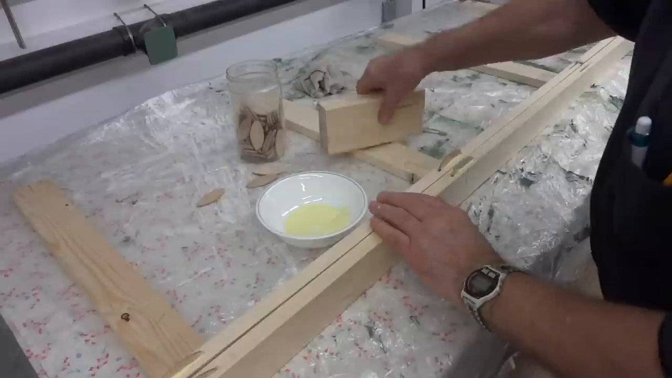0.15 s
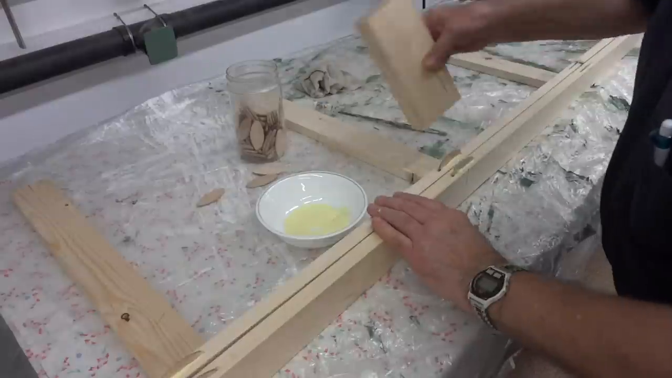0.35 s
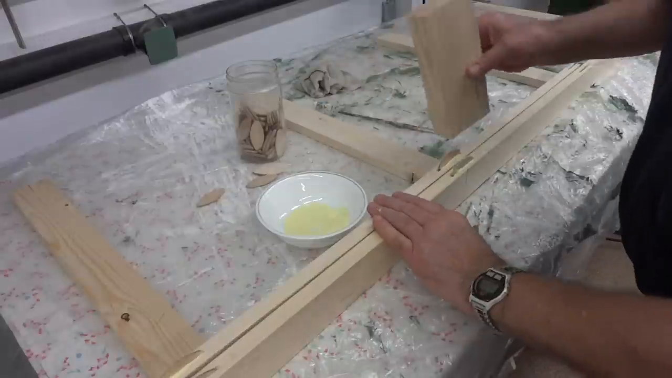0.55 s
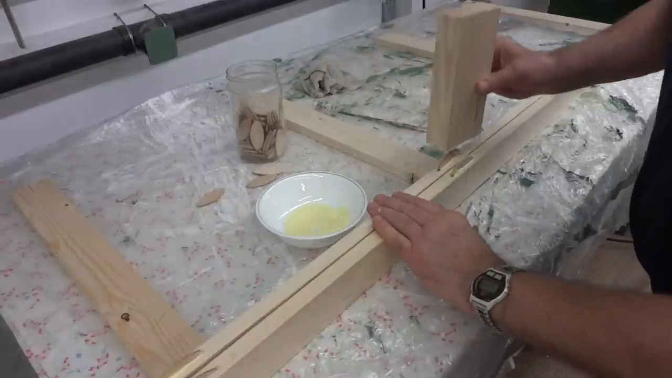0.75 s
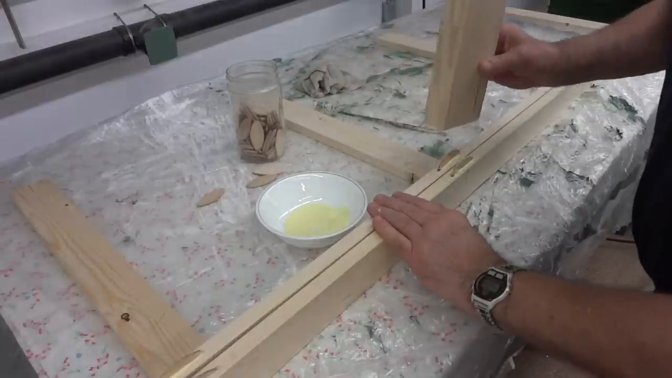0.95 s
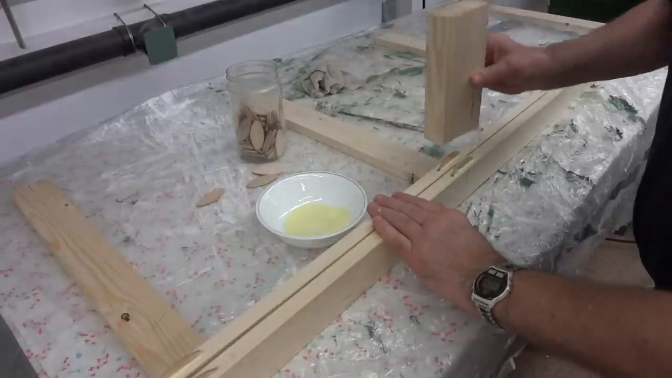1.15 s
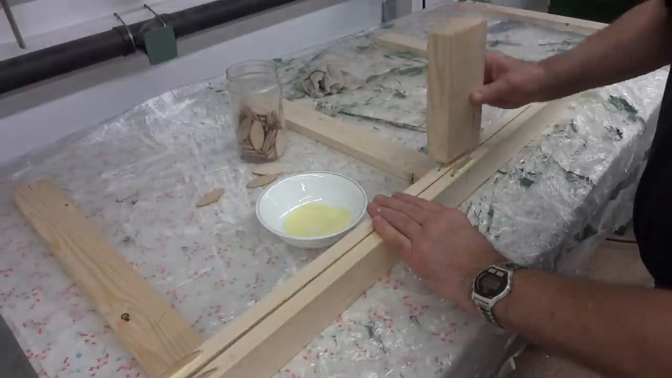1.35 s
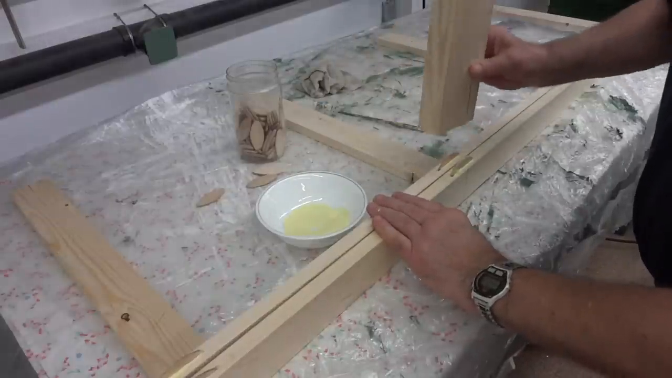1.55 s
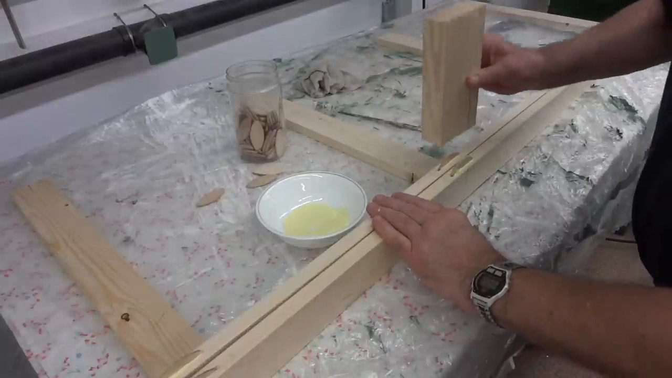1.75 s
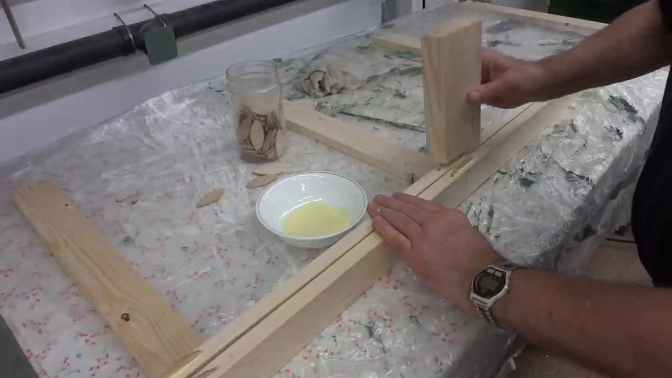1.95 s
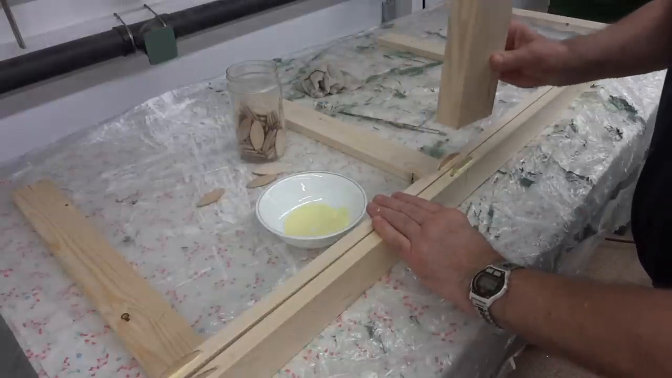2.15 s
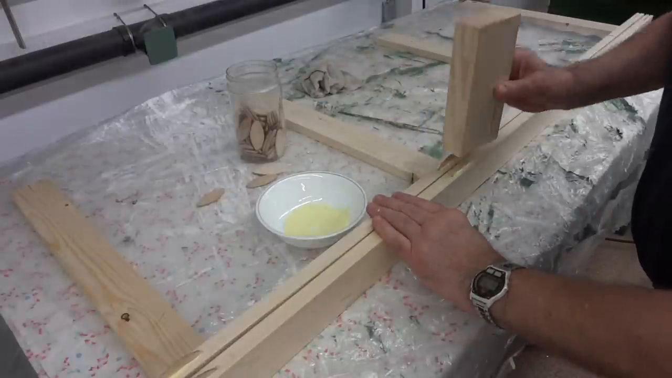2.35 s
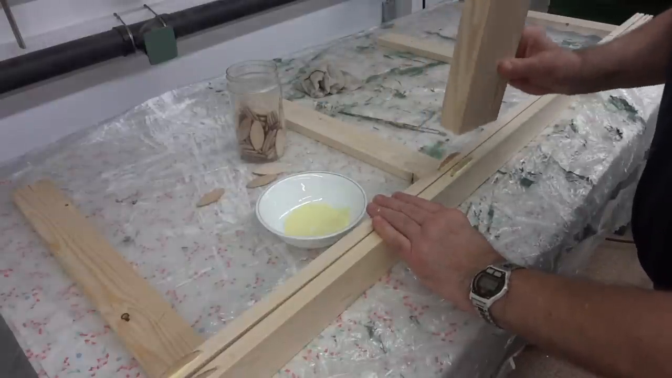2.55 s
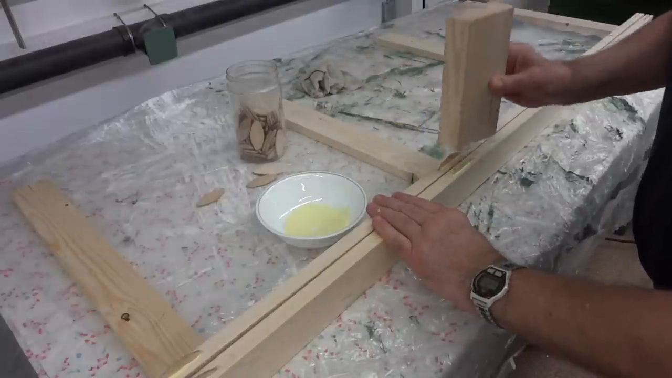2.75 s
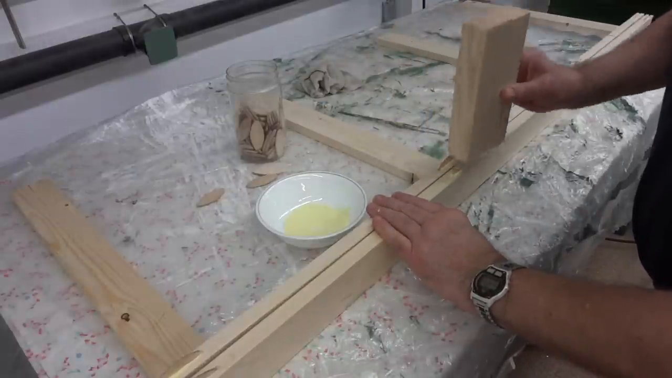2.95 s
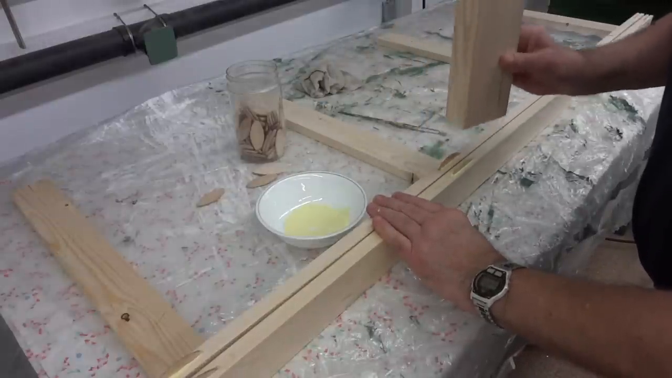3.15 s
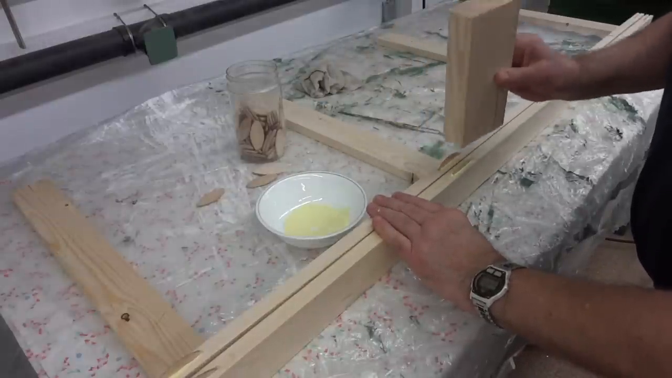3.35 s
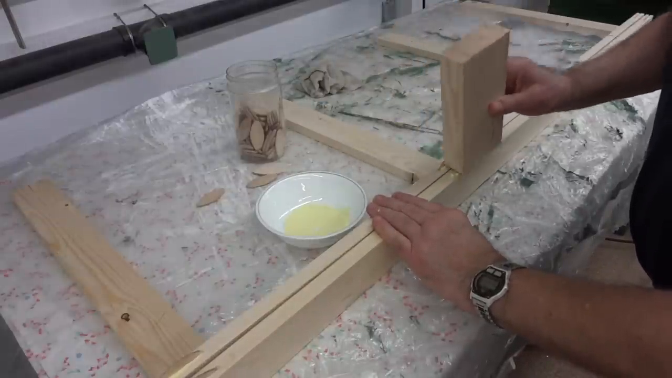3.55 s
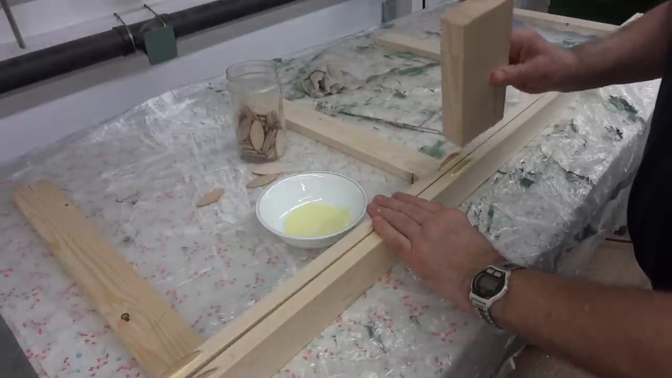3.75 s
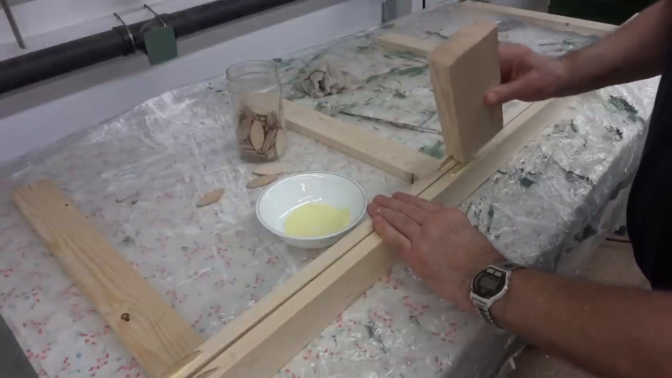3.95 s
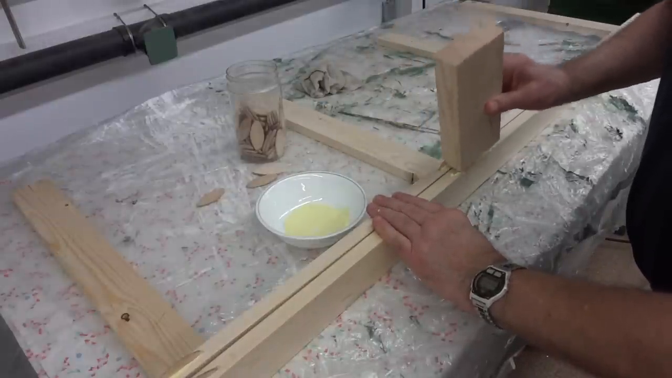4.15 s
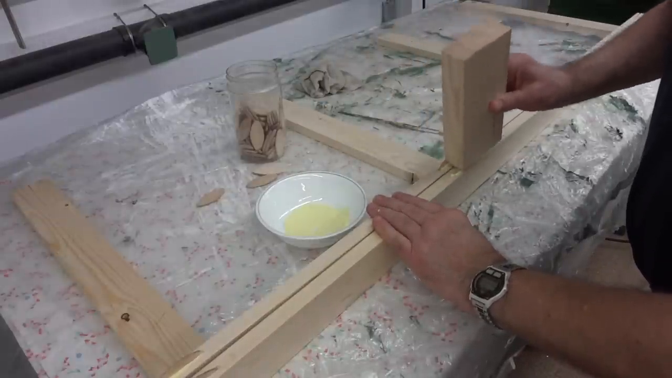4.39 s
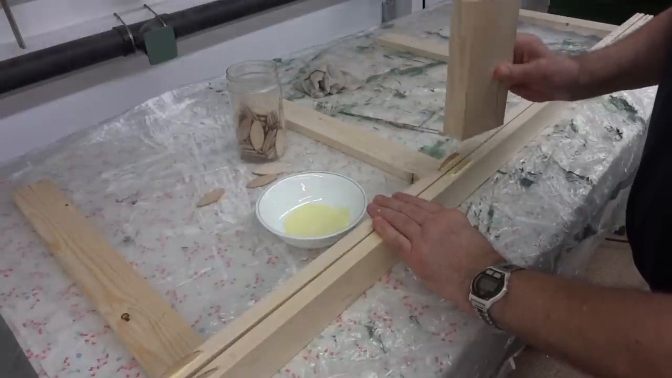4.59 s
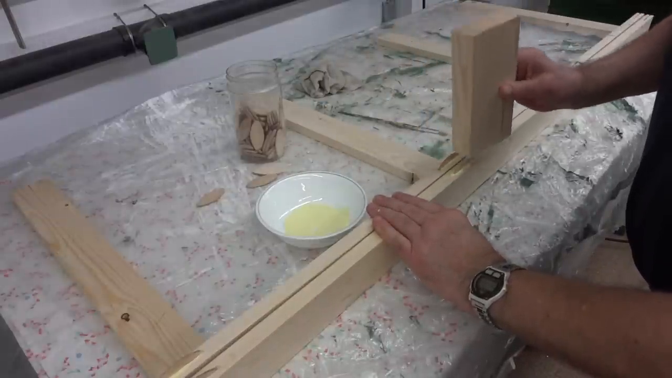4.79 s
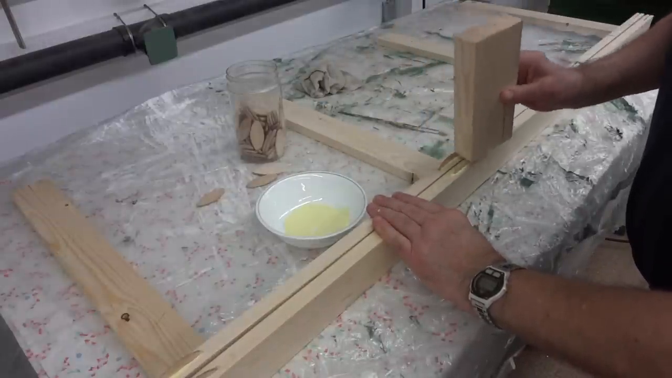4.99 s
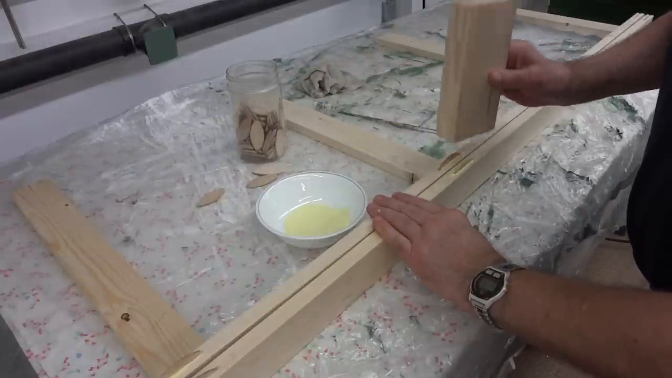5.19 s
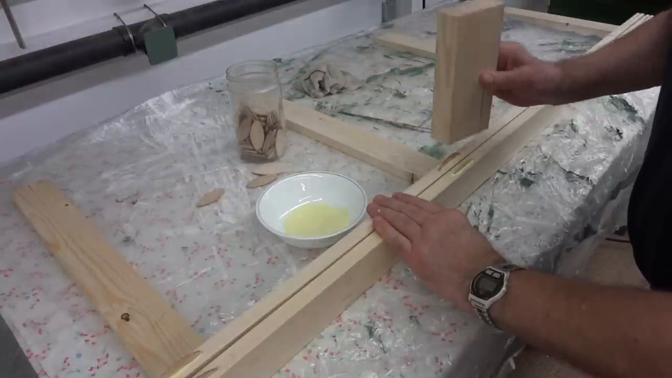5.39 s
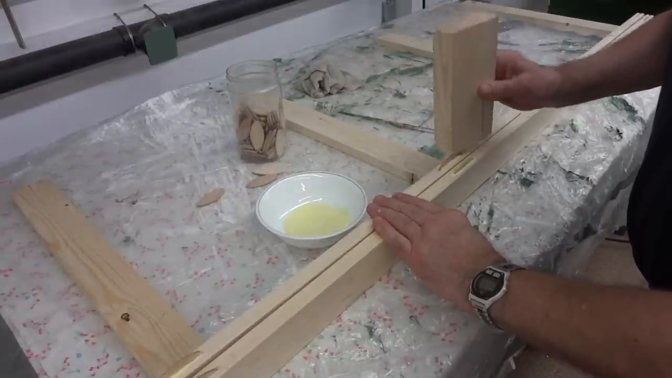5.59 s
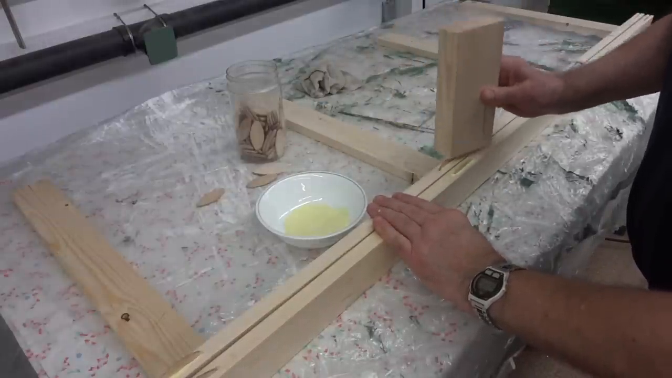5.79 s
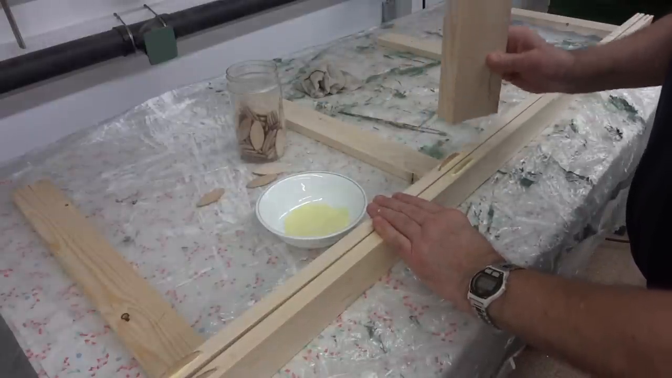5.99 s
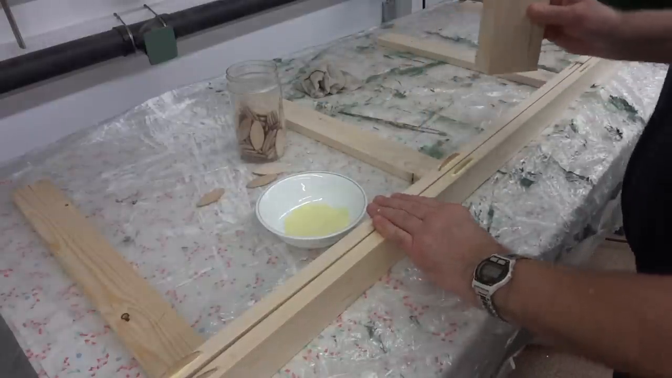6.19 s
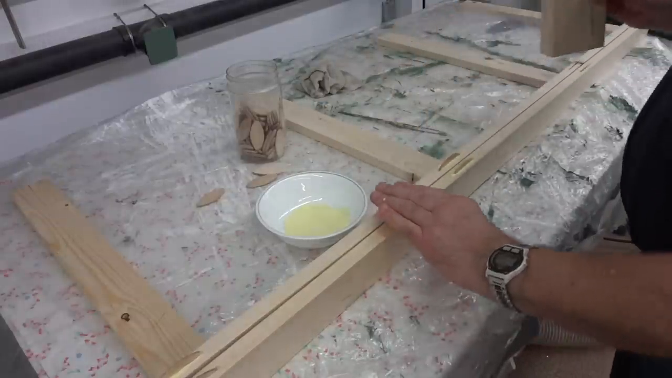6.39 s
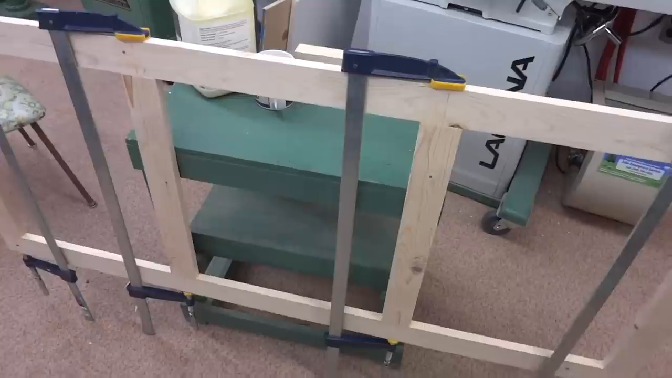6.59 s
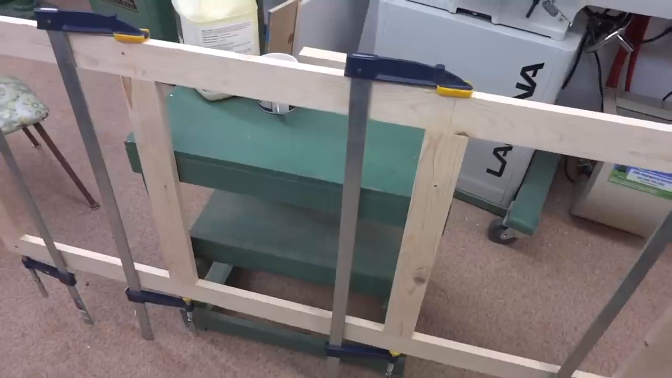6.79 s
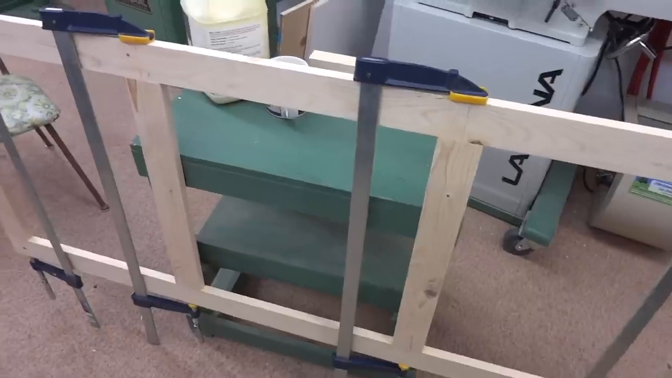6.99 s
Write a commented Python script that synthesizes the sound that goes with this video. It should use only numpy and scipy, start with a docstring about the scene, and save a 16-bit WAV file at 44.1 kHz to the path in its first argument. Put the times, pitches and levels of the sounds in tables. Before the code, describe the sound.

A wooden block is knocked against a joint in a wooden frame, heard close by in a small workshop. After a faint rub and tap of fingers on the block, the knocks grow from light to heavy, drop back to light ringing taps, then build again to three hard, booming blows. Each has a short echo. A low hush and barely audible ticking clocks lie underneath until the sound fades.

```python
"""In a quiet workshop, fingers slide over a wooden block and tap it as they pick it up.
Two faint clocks tick throughout. From about one second on, the block knocks seventeen times on a glued
joint of a timber frame lying on a workbench. Light blows on the rail's edge make the block ring; heavy,
square blows over the joint make frame and bench boom. The small room answers each knock and a limiter
flattens the loud ones. After three last heavy blows, everything fades out."""
import sys
import numpy as np
from scipy import signal
from scipy.fft import rfft, irfft
from scipy.io import wavfile
from scipy.ndimage import uniform_filter1d

SR = 44100
rng = np.random.default_rng(int(sys.argv[2]) if len(sys.argv) > 2 else 0)


def persist_wave(psi):
    """Save psi, clipped to +-1, as 16-bit WAV."""
    counts = np.round(np.clip(psi, -1, 1) * 32767).astype(np.int16)
    wavfile.write(sys.argv[1], SR, np.atleast_2d(counts).T)


N = 310093
SIZE = 2 ** 15  # samples in one knock, tap or tick, with its echo
HZ = np.fft.rfftfreq(SIZE, 1 / SR) + 1e-3  # the frequencies of its spectrum


def gain_of(db):
    """Turn decibels into a number to multiply by."""
    return 10 ** (np.asarray(db) / 20)


def curve(table, hz, column=1):
    """Read a column between the rows of a table, along straight lines over log frequency."""
    columns = np.transpose(table)
    return np.interp(np.log(hz + 1), np.log(columns[0] + 1), columns[column])


def add(mix, start_s, sound):
    """Mix a sound in at its start time, cutting off what runs past the end."""
    part = mix[:, round(start_s * SR):][:, :sound.shape[1]]
    part += sound[:, :part.shape[1]]


def ringing(hz, width, db):
    """Spectrum of an object's own tones. Narrow tones ring longer; neighbours swing opposite ways."""
    hz, width = hz[:, None], width[:, None]
    peaks = 1 / (1 + 1j * (HZ ** 2 - hz ** 2) / (HZ * width))
    return abs((gain_of(db) * (-1) ** np.arange(len(db))) @ peaks)


def struck(gain):
    """Spectrum of a click that has this gain and rings only after it starts."""
    log_gain = np.log(gain + 1e-4 * gain.max())
    mirrored = np.concatenate([log_gain, log_gain[-2:0:-1]])
    return np.exp(np.conj(signal.hilbert(mirrored)))[:len(HZ)]


# Stereo width. Sounds have a main part (mid) and a part that widens them (side).
# Each row: frequency in Hz, side level against mid in dB.
STEREO_WIDTH = [(40, -9), (120, -20), (350, -24), (700, -18.5), (1300, -13.5), (2800, -14.5), (5500, -11.5),
                (8000, -20)]
def noise(spectrum):
    """Mid and side noise with the given spectrum; the mid has level one."""
    hz = np.fft.rfftfreq(N, 1 / SR)
    shaped = rfft(rng.standard_normal((2, N))) * gain_of(curve(spectrum, hz))
    shaped[1] *= gain_of(curve(STEREO_WIDTH, hz))
    x = irfft(shaped, N)
    return x / x[0].std()


# The quiet of the workshop. Each row: frequency in Hz, relative level in dB.
HUSH_SPECTRUM = [(25, -14), (42, -11.5), (58, 4), (78, -14.5), (190, -14), (300, -6), (430, -0.5),
                 (580, -6.5), (740, -5), (1200, -16), (2150, -12), (3200, -18.5), (9400, -21),
                 (11000, -25.5)]
def room_hush(level_db=-57.5):
    """A faint, steady noise lies under everything."""
    return gain_of(level_db) * noise(HUSH_SPECTRUM)


# Skin on wood makes a high hiss and a low rub. Each row: frequency in Hz, relative level in dB.
HISS_SPECTRUM = [(2000, -35), (3300, -3.5), (3800, -12), (4350, -1), (4900, -9), (5500, -1), (6200, -5),
                 (7200, -2), (8000, -2), (9100, 3), (9800, 1), (11000, -4.5)]
RUB_SPECTRUM = [(300, -14), (700, -2), (2500, -4), (4500, -8), (8000, -11.5)]
# The finger slides. Each row: start in seconds, length in seconds, hiss level in dB, rub level in dB.
FINGER_SLIDES = [(0.057, 0.14, -57, -76), (0.174, 0.11, -54, -62), (.385, .13, -45, -63),
                 (0.479, .155, -51.5, -56), (.54, 0.14, -63, -51.5)]
def finger_slides(catch_db=2.0, skew=1.7, sharpness=1.1):
    """Skin slides over the block in small catches, louder the faster it moves."""
    t, out = np.arange(N) / SR, np.zeros((2, N))
    hiss, rub = noise(HISS_SPECTRUM), noise(RUB_SPECTRUM)
    for start, length, hiss_db, rub_db in FINGER_SLIDES:
        progress = np.clip((t - start) / length, 0, 1)
        speed = abs(np.sin(np.pi * progress ** skew)) ** sharpness  # speeds up slowly, stops sooner
        out += speed * (gain_of(hiss_db) * hiss + gain_of(rub_db) * rub)
    catches = uniform_filter1d(rng.standard_normal(N), size=120)
    return out * gain_of(catch_db * catches / catches.std())


# The tones of the tapped block. Each row: pitch in Hz, width in Hz, level in dB.
TAP_TONES = [(2480, 24, 1), (4420, 150, -18.5), (5300, 120, -21)]
# The finger taps. Each row: start in seconds, level in dB.
FINGER_TAPS = [(0.186, -2), (0.235, 3.5), (0.46, 8.5), (0.479, -4)]
def finger_taps():
    """Fingers tap the lifted block as they turn it upright, and it rings briefly."""
    out = np.zeros((2, N))
    tap = struck(ringing(*np.transpose(TAP_TONES)))
    for start, db in FINGER_TAPS:
        add(out, start, gain_of(db) * irfft(tap * room_path()))
    return out


# The workshop's echo. Each row: frequency in Hz, seconds to die away by 60 dB, seconds to build up,
# level of the first sound against the echo in dB.
ROOM_ECHO = [(100, 0.65, 0.013, -8), (257, 0.44, 0.0067, -19.5), (550, 0.37, 0.0055, -13),
             (1400, 0.27, 0.0042, -4), (3550, 0.24, 0.003, -4), (10400, 0.22, 0.005, 0)]
def room_path(scatter_s=0.0032):
    """Mid and side spectra of one random way through the room: a burst off the bench, then an echo."""
    hz, t, bands = signal.stft(rng.standard_normal((2, SIZE)), SR, nperseg=256)
    decay_s, build_s = curve(ROOM_ECHO, hz)[:, None], curve(ROOM_ECHO, hz, column=2)[:, None]
    shape = gain_of(-60 * t / decay_s) * (1 - np.exp(-(t + t[1] / 2) / build_s))
    shape /= np.sqrt((shape ** 2).sum(1, keepdims=True) * t[1] * SR)
    path = rfft(signal.istft(bands * shape, SR)[1][:, :SIZE])
    burst = rng.standard_normal(SIZE) * np.exp(-np.arange(SIZE) / SR / scatter_s)
    path[0] += gain_of(curve(ROOM_ECHO, HZ, column=3)) * rfft(burst / np.linalg.norm(burst))
    path /= np.sqrt(uniform_filter1d(abs(path) ** 2, size=25, axis=1))  # the room favours no band
    path = rfft(irfft(path)[:, :SIZE * 3 // 4], SIZE)
    path[1] *= gain_of(curve(STEREO_WIDTH, HZ))
    return path


# The two clocks. Each row: first tick in seconds, seconds between ticks.
TICK_TIMES = [(.333, .4415), (.265, .479)]
# The tones of a tick, one list for each clock. Each row: pitch in Hz, width in Hz, level in dB.
TICK_TONES = [
    [(5390, 150, -8.5), (5930, 180, -11), (6440, 350, -14.5), (7030, 340, -16.5)],
    [(2920, 180, -16.5), (3170, 200, -12.5)],
]
def clock_ticks():
    """Far off in the room, each clock ticks steadily as a small lever catches its wheel."""
    out = np.zeros((2, N))
    for (first, period), tones in zip(TICK_TIMES, TICK_TONES):
        tick = irfft(struck(ringing(*np.transpose(tones))) * room_path())
        for start in np.arange(first, N / SR, period):
            add(out, start, tick)
    return out


# The tones of the frame on the bench. Each row: pitch in Hz, width in Hz, level in dB when hit on the
# rail's edge, level in dB when hit over the joint.
FRAME_TONES = [(91, 17, -15, -20.5), (117.2, 13, -8.5, -20), (126.4, 13, -9.5, -20), (153.6, 14, -20, -18),
               (187.7, 11, -13, -13.5), (211, 19, -20, -12), (247, 17, -6.5, -9), (272, 8, 8.5, 1),
               (286.3, 18, -1, -2), (325.5, 29, 0, 1.5), (364.5, 16, 7, 1), (426.5, 42, -6.5, 1),
               (470, 35, -3.5, 4), (559.6, 40, 1, 2.5), (678.7, 40, -3, 3.5), (772, 42, 2, 1.5),
               (847.5, 70, 3, 2.5), (885.2, 30, 1, 5), (961, 27, -0.5, 1), (1068, 52, 2.5, 1.5),
               (1175, 25, 1, 3), (1278, 37, -0.5, 1.5), (1444, 133, -1.5, -0.5), (1682, 140, -4.5, -2),
               (1874, 110, 3, 1), (2150, 400, -6, -4.5), (2750, 23, 15.5, -8)]
def frame_boom(force_db, square, cutoff_hz, bench_below_hz=300, weak_below_db=24):
    """Spectrum of frame and bench booming. Weak blows barely reach the bench's low tones."""
    hz, width, edge_db, joint_db = np.transpose(FRAME_TONES)
    contact = 1 / np.sqrt(1 + (HZ / cutoff_hz) ** 4)  # a longer contact drives only the low tones
    bench_db = 1.2 * min(force_db - weak_below_db, 0) * (hz < bench_below_hz)
    return contact * ringing(hz, width, force_db + (1 - square) * edge_db + square * joint_db + bench_db)


# The tones of the knocking block. Each row: pitch in Hz, width in Hz, level in dB.
BLOCK_TONES = [(1144, 31, -1), (1555, 60, 1.5), (1803, 110, -13.5), (2363, 62, 5), (2817, 77, -1.5),
               (3006, 81, -7.5), (3630, 81, -10), (4030, 37, -11.5), (4550, 120, -17), (5560, 120, -18.5)]
def block_ring(force_db, shortness, square, flat):
    """Spectrum of the block ringing. Force and a short contact feed it; square or flat blows choke it."""
    hz, width, db = np.transpose(BLOCK_TONES)
    damping = 1 + 0.71 * square ** 2  # pressed on the joint, the block rings shorter
    grip = 1 + 0.004 * rng.standard_normal()  # the grip shifts its pitch a little
    ring_db = force_db + 4.5 + 8 * shortness - 21.5 * square - 3.5 * flat
    return ringing(hz * grip, width * damping, db + ring_db) / np.sqrt(damping)


# Two wooden faces meeting. Each row: frequency in Hz, relative level in dB.
CLACK_SPECTRUM = [(300, -14.5), (1200, -15), (2200, -5), (3300, -2), (4100, 1.5), (4900, -6.5),
                  (6500, -12.5), (11000, -26.5)]
def face_clack(shortness, flat):
    """Spectrum of the faces clacking, louder for a short contact or a flat slap."""
    pitch = 2 ** (-0.4 * flat)  # a flat slap touches more wood, which lowers the clack
    clack_db = 14.5 + 3 * shortness + 6.5 * flat
    return gain_of(clack_db + curve(CLACK_SPECTRUM, HZ / pitch))


# A sharp edge biting in. Each row: frequency in Hz, relative level in dB.
SNAP_SPECTRUM = [(1000.0, -24.5), (4000.0, -1.8), (7000.0, 4.5), (10500.0, -2)]
def edge_snap(force_db, square, flat, usual_force_db=30):
    """Spectrum of an edge snapping. It grows slowly with force and fades for square or flat blows."""
    snap_db = 11 + 0.6359 * (force_db - usual_force_db) - 11.5 * square - 18 * flat
    return gain_of(snap_db + curve(SNAP_SPECTRUM, HZ))


def wood_grain():
    """Random hills and valleys in a spectrum: the crowded high tones of the wood."""
    hills = uniform_filter1d(uniform_filter1d(rng.standard_normal(len(HZ)), size=110), size=110)
    return hills / hills.std()


# The blows. Each row: start in seconds, force in dB, squareness (0 on the rail's edge, 1 square over
# the joint), cutoff in Hz (higher for a shorter contact), bite in dB (how cleanly the block catches),
# flatness (0 when an edge leads, 1 when the faces slap together).
BLOWS = [ (0.907, 20, 0.14, 549, 4.5, 0.023), (1.1709, 19.5, 0.14, 1970, 1, 0.62),
         (1.451, 28, 0.32, 1460, 0.5, 0.32), (1.732, 42, 0.81, 1120, .5, 0.056),
         (2.014, 41.5, 0.75, 1325, -2.5, 0.052), (2.389, 17.5, 0.035, 2450, 0.5, 0.0044),
         (2.755, 18.5, 0.054, 2040, 1.5, 0.029), (3.095, 29.5, 0.18, 1030, 3, 0.1),
         (3.6523, 29.5, 0.27, 1520, 4.5, 0), (3.9812, 33, 0.29, 1300, 1, 0.053),
         (4.2503, 37.5, 0.36, 1480, 0.5, 0.4), (4.4795, 38, .42, 1500, -5.5, 0),
         (4.78, 41.5, 0.75, 970, -3.5, 0.09), (5.013, 38, 0.65, 1380, -3.5, 0.17),
         (5.3458, 44, 0.89, 2150, 2.5, 0.084), (5.5963, 44, 0.91, 2000, 1, 0.2),
         (5.9005, 43.5, 0.94, 1960, 3, 0.13)]
def knocks(stray=0.46, grain_db=3.0, usual_cutoff_hz=1400, late_share=0.7, spread_s=0.0082):
    """Each blow rings frame and block; blows on one spot take nearly the same way through the room."""
    out, edge_path, joint_path = np.zeros((2, N)), room_path(), room_path()
    edge_grain = wood_grain()
    for start, force_db, square, cutoff_hz, bite_db, flat in BLOWS:
        shortness = np.log2(cutoff_hz / usual_cutoff_hz)  # in octaves above an ordinary blow
        boom = frame_boom(force_db, square, cutoff_hz)
        ring = block_ring(force_db, shortness, square, flat)
        crack = np.hypot(face_clack(shortness, flat), edge_snap(force_db, square, flat))
        crack *= gain_of(grain_db * ((1 - square) * edge_grain + wood_grain()) / np.sqrt(2))
        knock = np.hypot(boom, gain_of(bite_db) * np.hypot(ring, crack))
        knock *= HZ ** 2 / (HZ ** 2 + 45 ** 2)  # timber gives off no deep bass
        path = np.cos(square * np.pi / 2) * edge_path + np.sin(square * np.pi / 2) * joint_path
        path = (path + stray * room_path()) / np.hypot(1, stray)
        # a square blow takes a moment to spread through the frame
        swell = 1 - late_share * square * np.exp(-np.arange(SIZE) / SR / spread_s)
        add(out, start, swell * irfft(struck(knock) * path))
    return out


def scene():
    """Add up all sounds and turn mid and side into left and right, the left a touch louder."""
    mid, side = knocks() + finger_slides() + finger_taps() + clock_ticks() + room_hush()
    return np.array([mid + side, mid - side]) * gain_of([[0.15], [-0.15]])


def limiter(x, threshold_db=-7, release_db_per_s=170, treble_hz=1500):
    """Turn loud moments down at once and recover quickly, listening mostly to the treble."""
    mid = x.mean(0)
    treble = np.gradient(mid) * SR / (2 * np.pi * treble_hz)
    level_db = 10 * np.log10(abs(uniform_filter1d(mid ** 2 + treble ** 2, size=130)) + 1e-12)
    fall_db = np.arange(N) / SR * release_db_per_s
    held_db = np.maximum.accumulate(level_db + fall_db) - fall_db
    over_db = np.maximum(held_db - threshold_db, 0)
    return x / gain_of(uniform_filter1d(over_db, size=60))


# The closing fade. Each row: time in seconds, volume (1 is full).
FADE_OUT = [(6.05, 1), (6.3, 0.8), (6.501, 0.24), (6.56, 0.0094)]
def record(dry, top_hz=11150):
    """Limit the loud knocks, round off their peaks, fade out and cut the highest treble."""
    x = limiter(dry)
    x = x / (1 + x ** 6) ** (1 / 6)
    x = x * np.interp(np.arange(N) / SR, *np.transpose(FADE_OUT))
    lowpass = signal.firwin(301, top_hz, window=("kaiser", 8), fs=SR)
    return signal.oaconvolve(x, lowpass[None], "same")


dry = scene()
out = record(dry)
persist_wave(out)
```